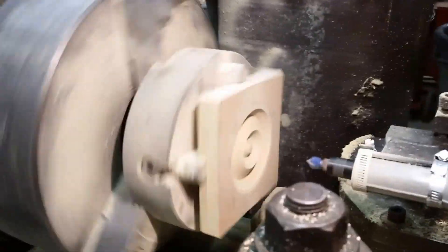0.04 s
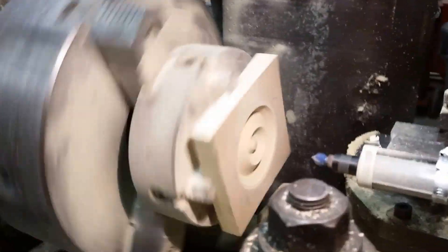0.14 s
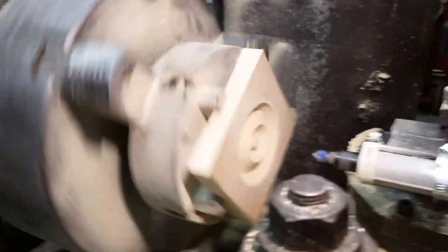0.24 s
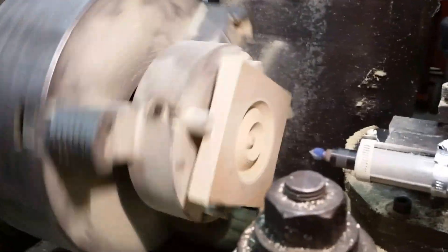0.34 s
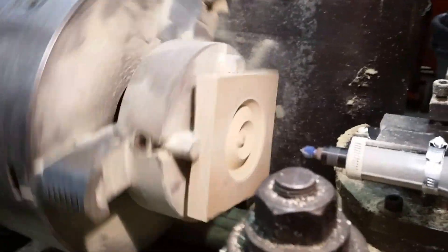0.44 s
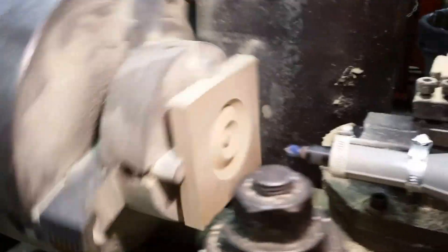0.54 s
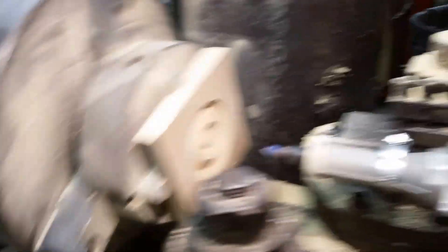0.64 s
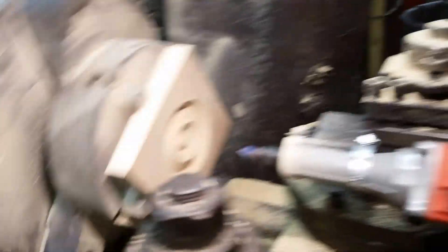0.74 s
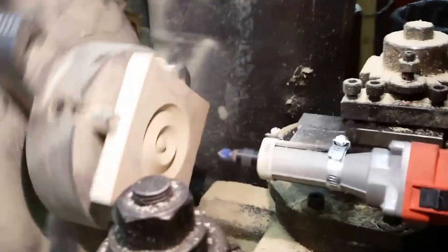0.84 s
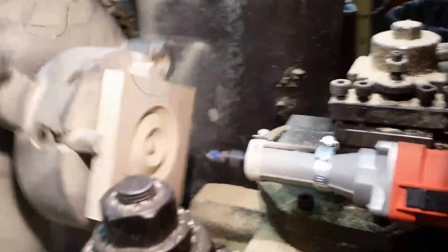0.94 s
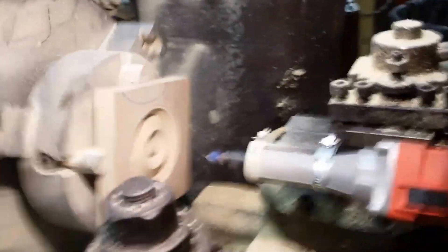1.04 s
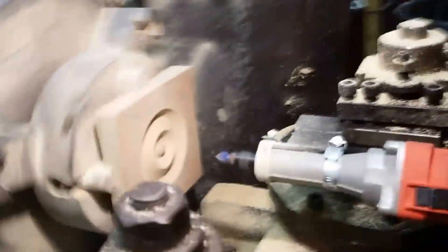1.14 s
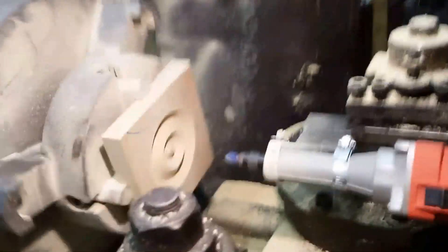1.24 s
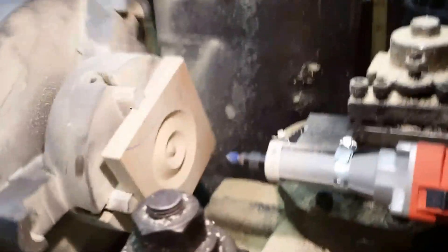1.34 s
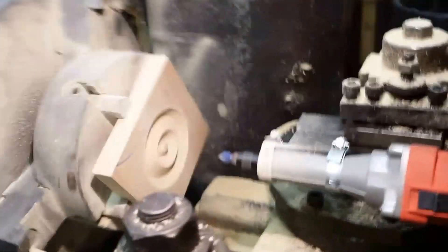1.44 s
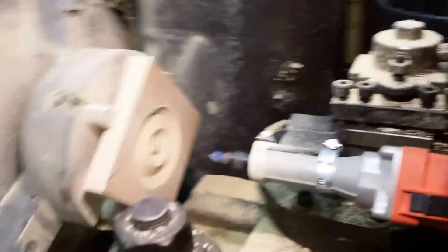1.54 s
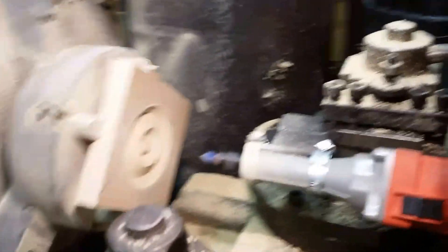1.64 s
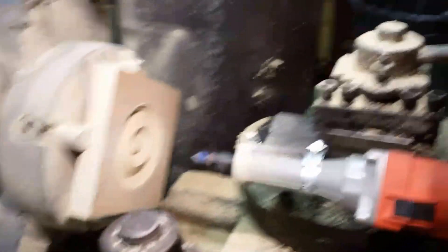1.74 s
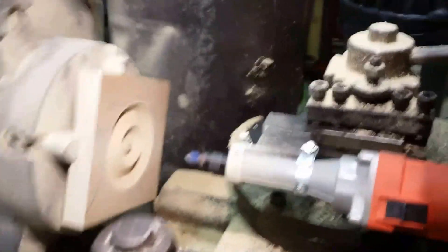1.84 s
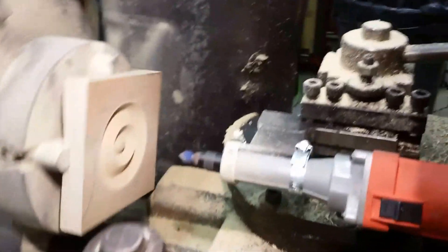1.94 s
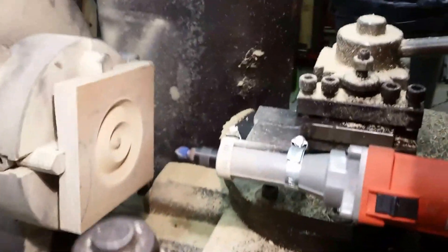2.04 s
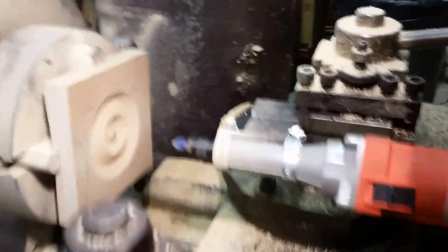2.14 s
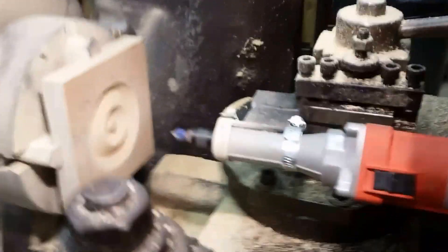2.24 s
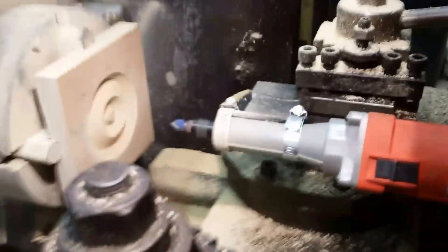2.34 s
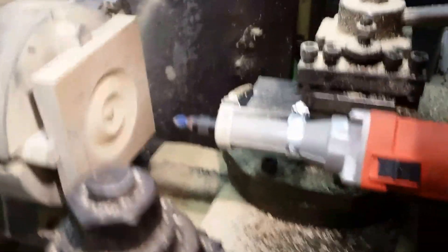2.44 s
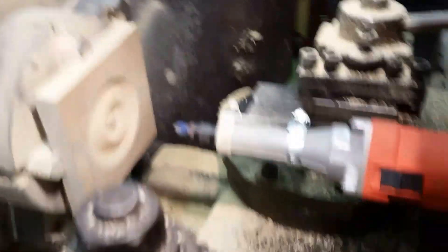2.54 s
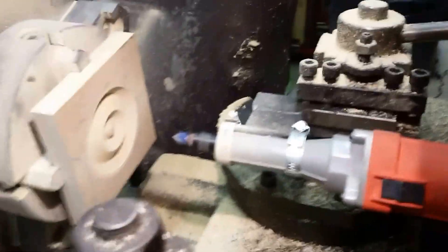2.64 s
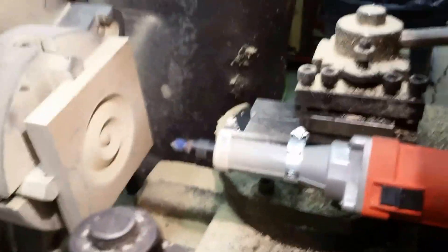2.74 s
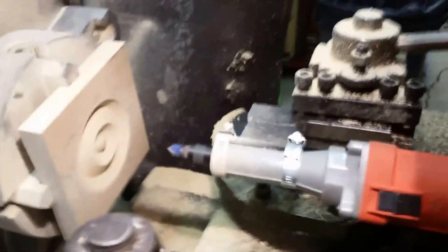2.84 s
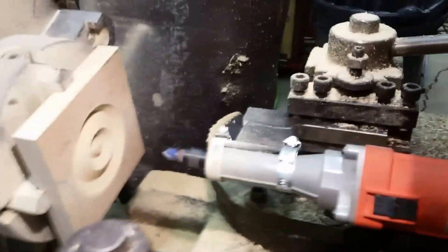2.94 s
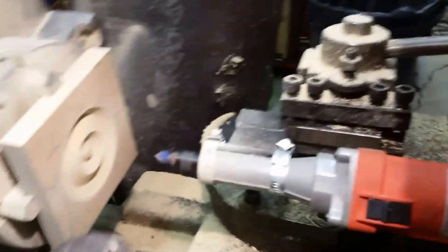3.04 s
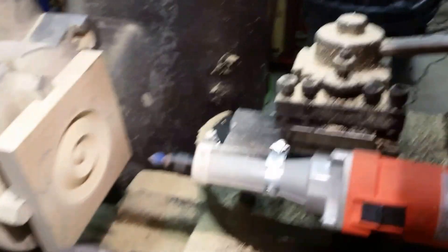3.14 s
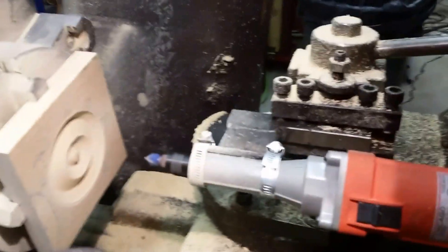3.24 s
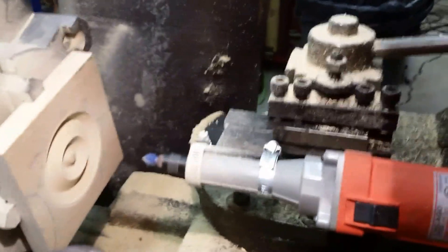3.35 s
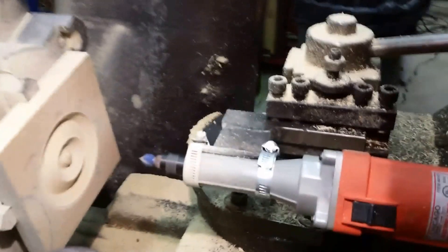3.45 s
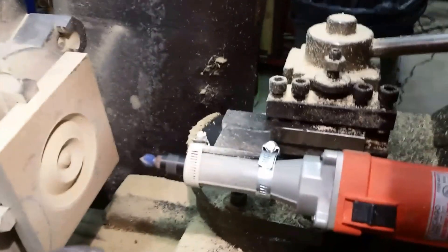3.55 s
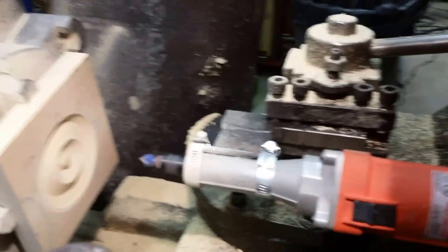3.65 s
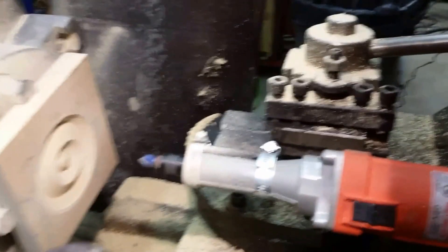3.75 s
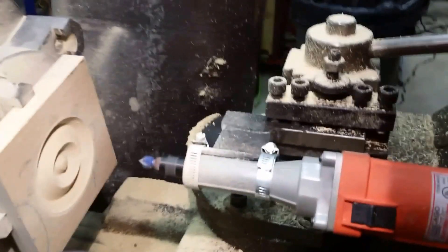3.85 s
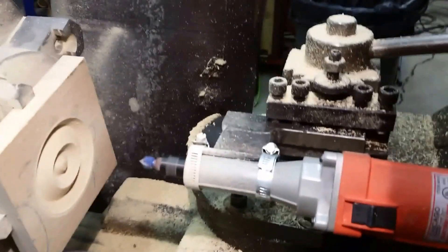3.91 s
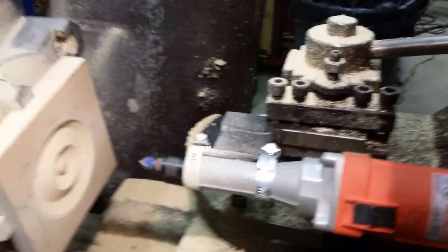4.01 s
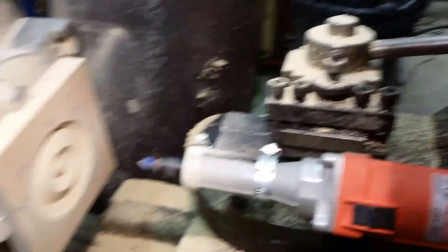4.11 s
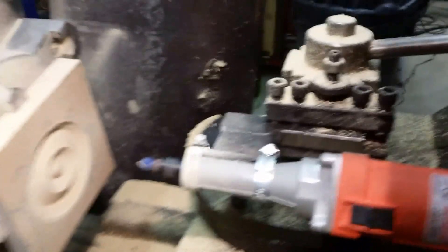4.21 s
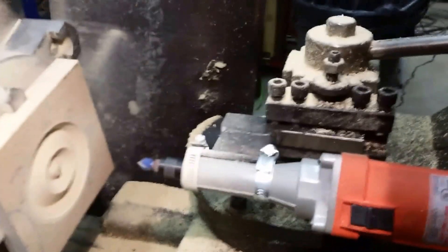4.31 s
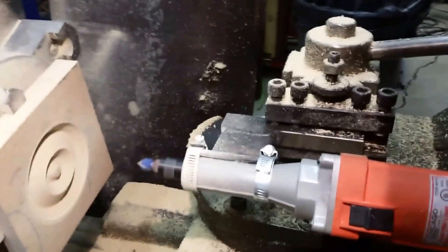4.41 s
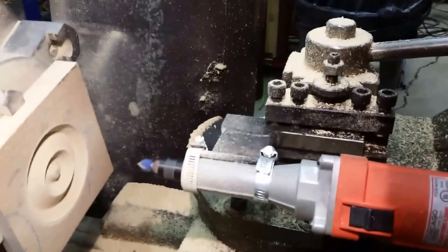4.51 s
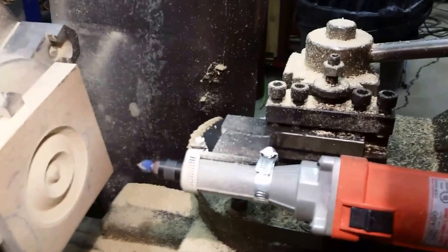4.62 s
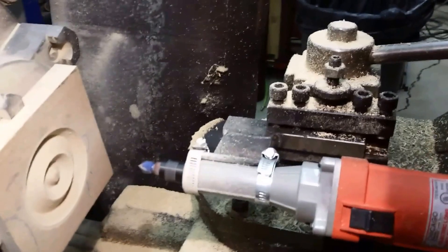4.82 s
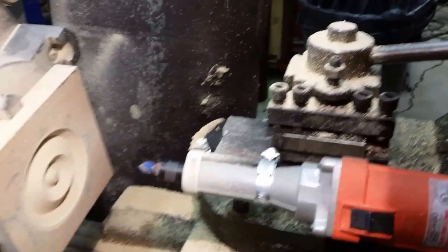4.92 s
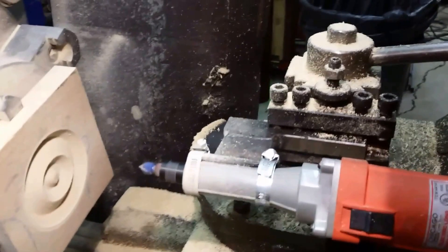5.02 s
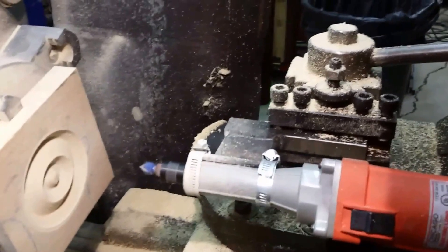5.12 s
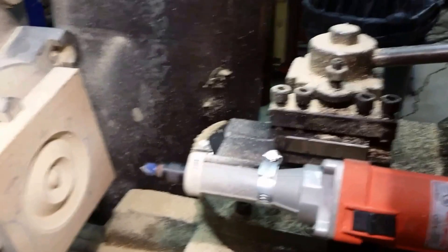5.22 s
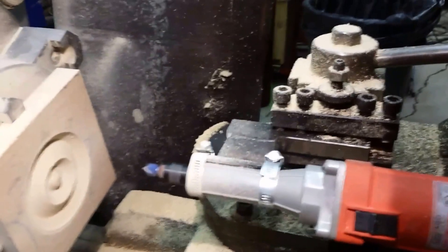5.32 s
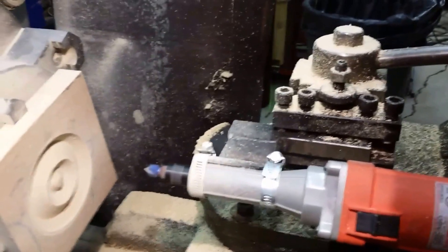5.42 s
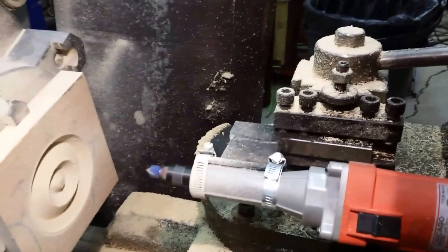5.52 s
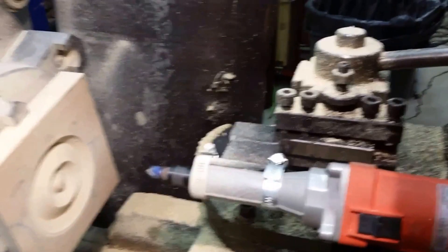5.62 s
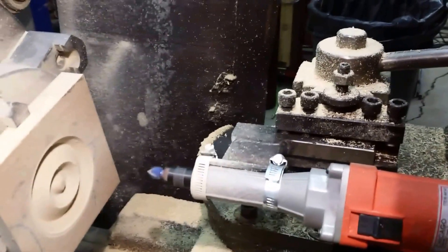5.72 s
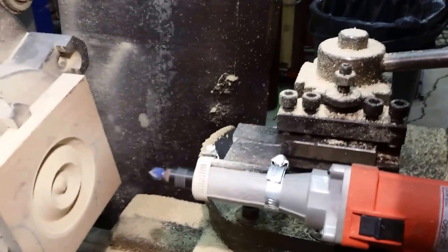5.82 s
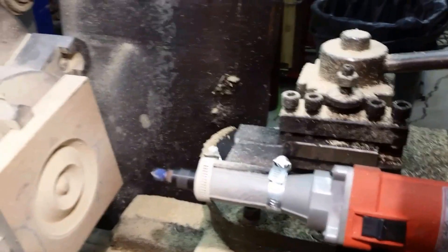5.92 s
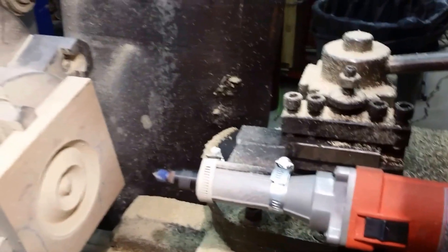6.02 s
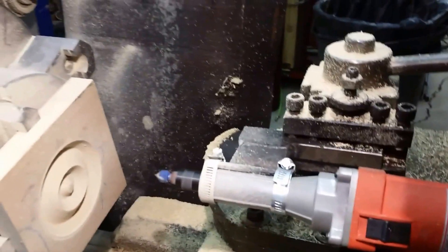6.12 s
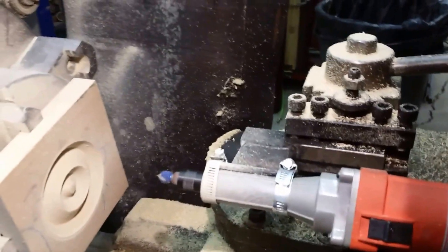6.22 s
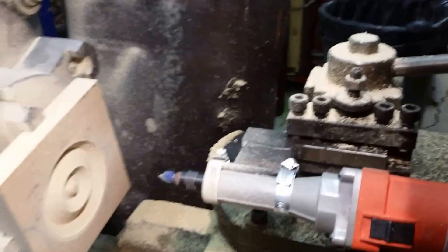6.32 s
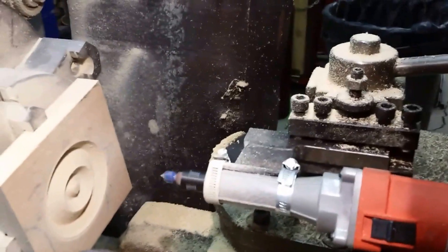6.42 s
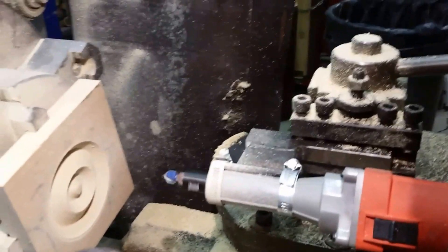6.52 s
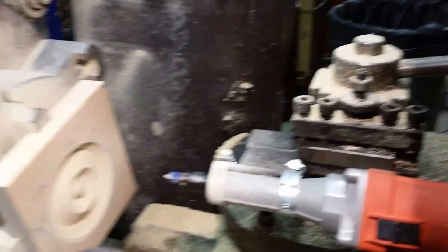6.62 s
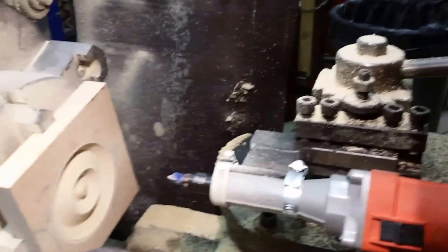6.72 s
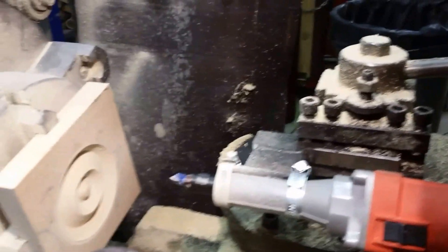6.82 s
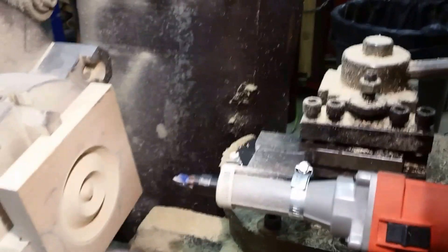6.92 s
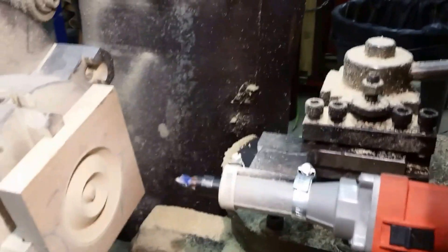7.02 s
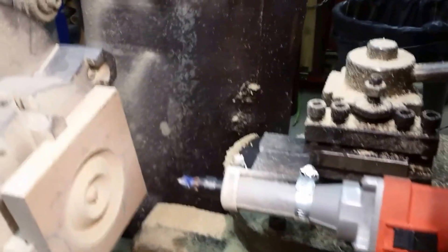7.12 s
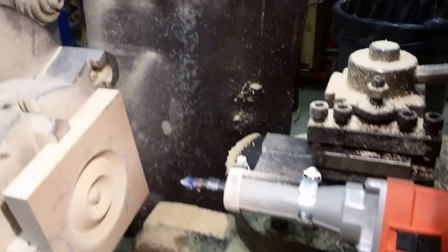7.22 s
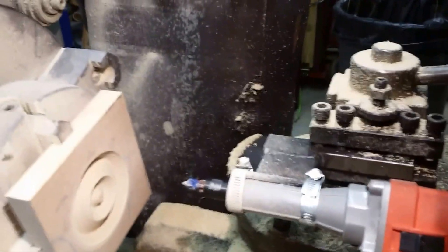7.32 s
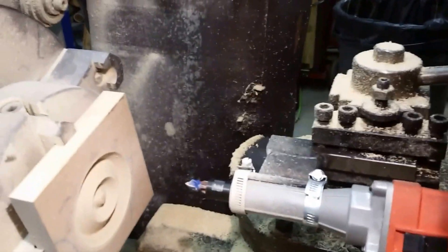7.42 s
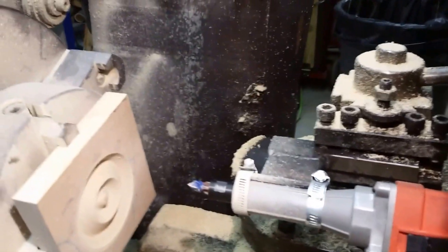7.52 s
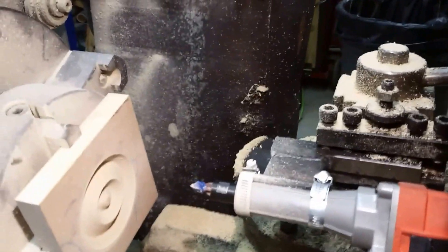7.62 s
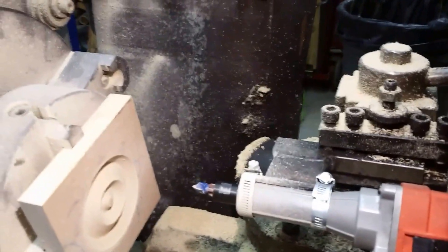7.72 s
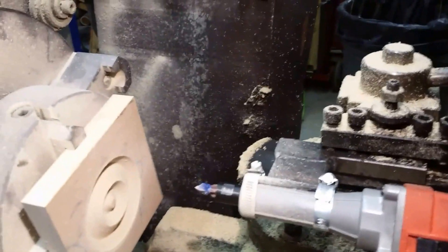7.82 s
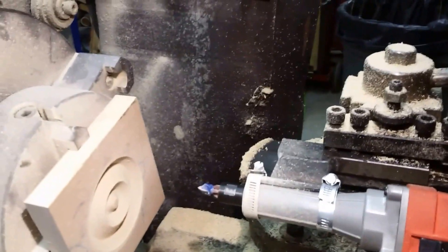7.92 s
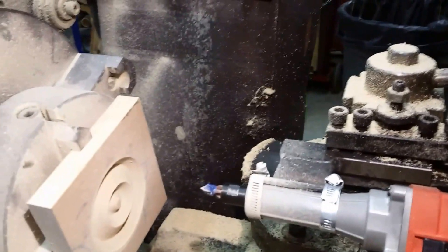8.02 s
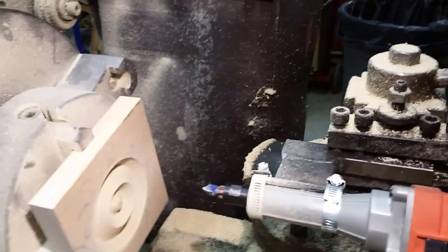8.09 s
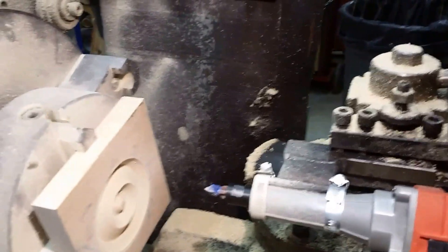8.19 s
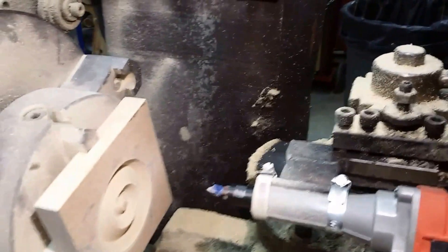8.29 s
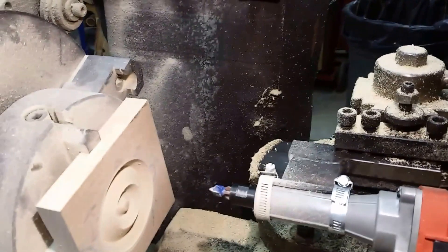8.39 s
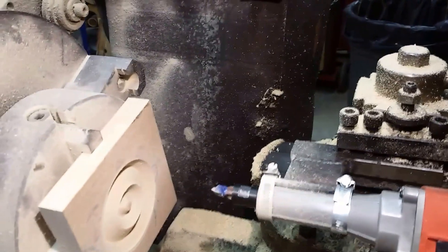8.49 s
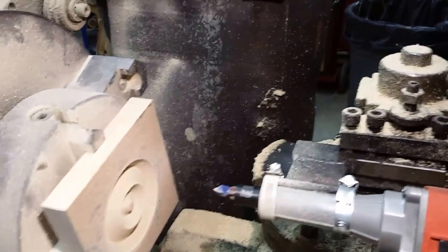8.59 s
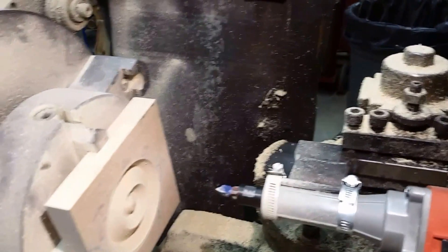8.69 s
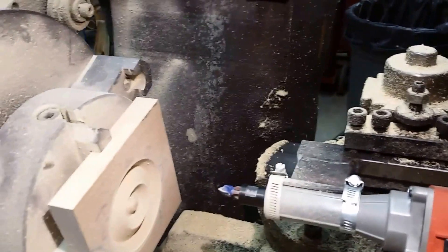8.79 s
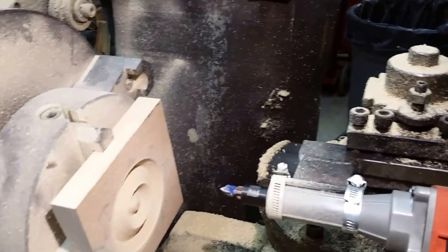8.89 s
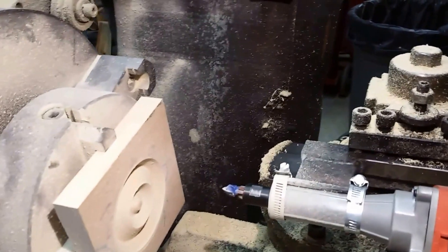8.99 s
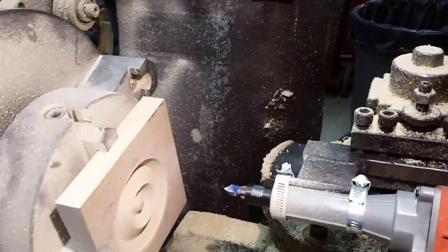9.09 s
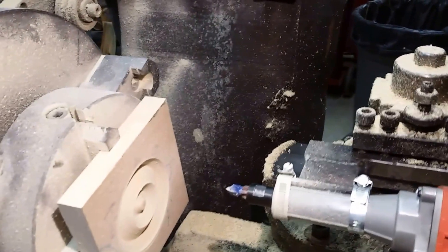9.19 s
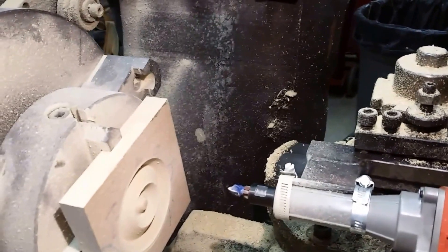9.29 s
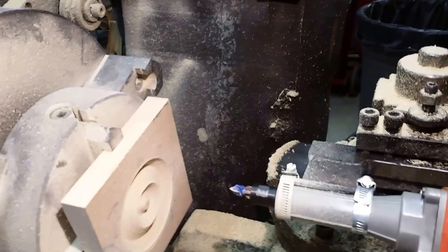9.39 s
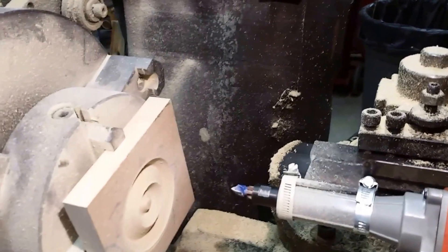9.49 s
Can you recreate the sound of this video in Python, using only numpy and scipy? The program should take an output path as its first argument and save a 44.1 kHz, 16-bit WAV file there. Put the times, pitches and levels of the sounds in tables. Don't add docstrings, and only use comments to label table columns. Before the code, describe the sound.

A switched-off die grinder's shrill whine glides steadily down through rushing air and brush hiss, rattles briefly, clicks to a stop, leaving quiet motor hum.

```python
import sys
import numpy as np
from scipy import signal
from scipy.fft import rfft, irfft, next_fast_len
from scipy.io import wavfile
from scipy.ndimage import uniform_filter1d, map_coordinates

SR = 44100
rng = np.random.default_rng(int(sys.argv[2]) if len(sys.argv) > 2 else 0)


def level_to_linear(level):
    exponent = np.asarray(level, float) / 20
    return 10 ** exponent


def output_pcm(signal):
    pcm = np.clip(np.atleast_2d(signal).T, -1, 1) * 32767
    wavfile.write(sys.argv[1], SR, np.round(pcm).astype(np.int16))


N = 421155
TIME_S = np.arange(N) / SR


def unit(x):
    return x / np.sqrt(np.mean(x ** 2) + 1e-20)


def along(points, hz):
    f, v = np.transpose(points)
    return np.interp(np.log(hz + 1), np.log(f + 1), v)


def curves(rows):
    s, *cols = np.transpose(rows)
    return [np.interp(TIME_S, s, c) for c in cols]


def wobble(rate_hz):
    knots = rng.standard_normal(int(N * rate_hz / SR) + 4)
    return map_coordinates(knots, [np.arange(N) * rate_hz / SR])


def filtered(x, response):
    m = next_fast_len(N + 8192)
    return irfft(rfft(x, m) * response(np.fft.rfftfreq(m, 1 / SR)), m)[..., :N]


def rush(spectrum, patchy_db):
    z = signal.stft(rng.standard_normal((2, N)), nperseg=512)[2]
    field = uniform_filter1d(rng.standard_normal(z.shape[1:]), 6, 0)
    field = uniform_filter1d(field, 12, 1)
    pair = signal.istft(z * level_to_linear(patchy_db * unit(field)), nperseg=512)[1][:, :N]
    return unit(filtered(pair, lambda hz: level_to_linear(along(spectrum, hz))))


# time in seconds, speed in turns per second (Hz).
SPEED = [(0, 460), (.3, 419.5), (.6, 381.8), (.9, 348), (1.2, 317.4), (1.6, 281.2), (2, 248.5),
         (2.4, 218.8), (2.8, 191.6), (3.2, 168.5), (3.6, 146.9), (4, 126.2), (4.4, 105.6), (4.8, 85.7),
         (5.2, 66.5), (5.7, 43.5), (6.5, 8)]


def shaft():
    speed_hz, = curves(SPEED)
    return np.cumsum(speed_hz) / SR, speed_hz


# order, level in dB at 200 Hz shaft speed, change in dB per octave of speed.
ORDER = [(1, -33.8, 3.3), (2, -48.0, 4.9), (3, -45.5, -1.4), (4, -48.4, 2.7), (5, -46.9, 11.3),
         (6, -48.9, 11.2), (7, -47.7, 13.1), (8, -53.2, 10.8), (9, -51.5, 0.6), (10, -50.5, 10.5),
         (11, -49.5, 1.5), (12, -41.2, 1.8), (13, -50.9, -0.0), (14, -53.9, 1.7), (15, -55.9, 5.9),
         (16, -60, 5), (17, -59, 5), (18, -55.4, 5.2), (19, -54.7, 4.6), (20, -54.5, 1.2),
         (23, -56.6, -5.9), (24, -53.0, -8.0), (36, -56.3, -15.4), (48, -55, -4.3), (60, -52.0, 0.2)]
# centre in Hz, width in Hz, peak in dB.
RESONANCES = [(134, 28, -3.1), (214, 18, -15.7), (315, 58, -5.8), (413, 43, -12.7), (581, 86, -3.4),
              (684, 77, 2.2), (842, 139, 6.4), (992, 154, 3.7), (1116, 145, 2.6), (1369, 182, 5.8),
              (1606, 209, 6.2), (1727, 209, 6.1), (1997, 469, -2.7), (2334, 390, -5.3),
              (2908, 486, -6.6), (3391, 285, 4.4), (3631, 422, 8.6), (4012, 358, 12.6), (4405, 393, 11.7),
        (4781, 477, -1.9), (5253, 478, 9.7), (5614, 638, -8.0), (6016, 774, 3.0), (7300, 951, -11.0),
        (13500, 4000, -7)]
# time in seconds, level in dB, treble over bass in dB.
SONG = [(0.0, -0.9, 1.9), (0.3, 2.5, 3.3), (0.55, 3.8, 4.0), (0.8, 3.5, 1.0), (1.2, -4.4, -5.3),
        (1.45, -3.8, -3.7), (2.0, 4.2, -1.8), (2.4, 5.9, -0.3), (2.9, 3.2, -3.2), (3.5, 3.9, -0.0),
        (4.2, -1.4, -1.7), (4.7, -4.4, 1.4), (5.6, -12.4, 10.9)]
# time in seconds, half length in
# seconds, order, lift in dB.
FLARES = [(-0.04, 0.44, 10, -11), (0.02, 0.1, 8, -12.5), (0.45, 0.11, 8, 7.0), (0.62, 0.08, 14, -8.2),
          (0.76, 0.12, 11, -11.6), (0.83, 0.23, 7, -10.1), (0.92, 0.19, 10, -9.3), (1.2, 0.41, 9, 16.2),
          (1.22, 0.23, 15, 13.8), (1.29, 0.43, 14, 7.7), (1.51, 0.44, 10, 9.1), (1.57, 0.23, 13, 9.8),
          (1.6, 0.16, 6, 6.8), (1.69, 0.16, 8, 11.6), (1.8, 0.31, 5, -8.8), (2.14, 0.19, 20, 9.9),
          (2.29, 0.36, 9, 7.2), (2.76, 0.3, 6, -11.1), (2.96, 0.16, 10, 7.7), (3.3, 0.2, 12, 6.2),
          (3.33, 0.33, 8, 9.3), (3.74, 0.18, 12, -9.1), (4.4, 0.49, 24, 14.4), (4.45, 0.34, 23, 13.2),
          (.15, .15, 12, 2), (.45, .11, 12, -5), (1.05, .18, 12, -6), (1.58, .12, 3, -1),
               (4.17, .035, 36, -6), (4.39, .07, 36, -9), (4.66, .06, 36, -3), (3.6, .2, 36, -4),
               (.33, .07, 10, -6), (1.2, .1, 5, -1.5), (1.4, .07, 6, -6), (2.7, .3, 3, -1),
          (.22, .07, 6, -8), (.45, .07, 6, 3), (.7, .05, 6, -6), (.7, .06, 7, -6), (.72, .08, 8, -5),
            (.07, .04, 9, 7), (.63, .06, 9, 5), (.02, .03, 10, -8), (.42, .03, 10, -3), (.57, .04, 10, -3),
            (.08, .03, 11, 5), (.2, .04, 11, -5), (.33, .03, 12, -5), (.03, .05, 12, 2), (1.1, .25, 36, 12),
            (3.65, .2, 36, 4), (3.96, .03, 36, 5), (4.09, .03, 36, 6), (3.2, .4, 48, -6), (1.8, .5, 48, 3),
            (2.3, .6, 60, -5), (4.27, .04, 36, 3), (4.02, .025, 36, -5), (.05, .08, 6, 4), (.4, .1, 15, 2),
            (2.4, .3, 5, 2), (.5, .1, 11, -3), (4.2, .1, 24, -4), (.3, .1, 5, -3), (.2, .08, 8, 2),
            (1.85, .15, 7, 3), (3.5, .15, 10, 4)]


def orders(turns, speed_hz):
    n = int(6.3 * SR)
    at = np.arange(0, n, 256)
    at_s = at / SR
    out = np.zeros((2, N))
    centre_hz, width_hz, peak_db = np.transpose(RESONANCES)
    flutter = [wobble(24.73)[:n], wobble(40)[:n], wobble(60)[:n]]
    crawl_hz, reference_hz = 45, 200
    octaves = np.log2(np.maximum(speed_hz[at], crawl_hz) / reference_hz)
    song_db, facing_db = (c[at] for c in curves(SONG))
    settle_s, settle_db_per_s = 5.25, 25
    song_db = song_db - settle_db_per_s * np.clip(at_s - settle_s, 0, None)
    flares = FLARES
    for row, (order, db, slope_db) in enumerate(ORDER):
        hz = order * speed_hz[at]
        modes = level_to_linear(peak_db) / (1 + (2 * (hz[:, None] - centre_hz) / width_hz) ** 2)
        ring = np.sqrt(np.sum(modes ** 2, axis=1))
        flare_db = sum(lift_db * np.exp(-((at_s - s) / half_s) ** 4)
                       for s, half_s, k, lift_db in flares if k == order)
        treble = np.tanh(3 * np.log(hz / 2700))
        swell = ring * level_to_linear(db + slope_db * octaves + song_db + facing_db * treble + flare_db)
        off_slot = order % 12
        rough = 1 + 0.054 * off_slot
        shake_db = 1.1 * rough * flutter[row % 3] + (.6 + .8 * (off_slot > 0)) * wobble(13)[:n]
        level = 1.62 * np.interp(np.arange(n), at, swell) * level_to_linear(shake_db)
        jitter_turns = 0.036 * rough * flutter[(row + 1) % 3]
        phase = 2 * np.pi * (order * turns[:n] + jitter_turns + row * .37)
        out[:, :n] += level * np.array([np.sin(phase), np.cos(phase)])
    return out


def hand_shade():
    middle_s, width_s = .75, .035
    return np.exp(-.5 * ((TIME_S - middle_s) / width_s) ** 2)


# time in seconds, level in dB, treble over bass in dB facing the vents.
TOOL = [(0, -1.5, 5.5), (.3, -1, 4), (.5, -2, 5), (.66, -2, 5), (.88, 1, 0.9), (1.2, 2, -1), (1.4, 0, 0.3),
        (1.55, 0.6, 0), (2, 1, -0.2), (2.35, 3, -0.6), (2.8, 2.5, -1.7), (3.2, 1, 0.2), (3.6, 1.3, -0.5),
        (4.2, 0.2, 0.5), (4.7, 0, -0.8), (5.2, -3, 0.5), (5.7, -9, 4), (6.2, -16, 5.5)]


def heard_db(db, grows, turned, shade_loss_db):
    level_db, facing_db = curves(TOOL)
    return db + grows * level_db + turned * facing_db - shade_loss_db * hand_shade()


def unbalance(depth_db, turns, speed_hz):
    loose = np.clip(60 / speed_hz, 0, 1.2)
    return level_to_linear(depth_db * loose * (np.cos(2 * np.pi * turns) + 0.28 * np.cos(np.pi * turns)))


# time in seconds, level in dB.
GAIN = [(0, -55), (.25, -64), (1.46, -59.5), (2.25, -50), (4.23, -36.5), (5.4, -35), (9.55, -35)]


def gain_below_end_db():
    gain_db, = curves(GAIN)
    return gain_db - gain_db[-1]


# frequency in Hz, level in dB per Hz.
CASING = [(150, -23), (300, -10), (500, -2.5), (700, 1), (900, 6), (1150, 0), (1350, -49), (1600, -60)]


def casing_air(shake):
    quiet_db = 8 * np.clip(TIME_S - 4.7, 0, 3)
    level_db = heard_db(-36.5, grows=0.15, turned=0.43, shade_loss_db=4)
    level_db = level_db + 0.079 * gain_below_end_db() + 0.3 * shake - quiet_db
    return level_to_linear(level_db) * rush(CASING, patchy_db=1.5)


# frequency in Hz, level in dB per Hz.
VENT = [(1000, -34), (1200, 0.5), (1400, 2.5), (1700, 6.5), (2100, 3), (2500, -2), (2950, -4.5),
        (3300, -40)]


def vent_air(shake, turns, speed_hz):
    level_db = heard_db(-30.5, grows=0.77, turned=-0.7, shade_loss_db=4) + .3 * shake
    return level_to_linear(level_db) * unbalance(3, turns, speed_hz) * rush(VENT, patchy_db=.5)


# frequency in Hz, level in dB per Hz.
FAN = [(2700, -24.5), (3050, -2), (3600, 4), (4000, 4), (4500, 7), (4900, 4.5), (5300, 1.5), (5800, -30)]


def fan_air(shake, turns, speed_hz):
    level_db = heard_db(-26.5, grows=1.56, turned=1.55, shade_loss_db=-2.5) + .3 * shake
    return level_to_linear(level_db) * unbalance(1.2, turns, speed_hz) * rush(FAN, patchy_db=.6)


# frequency in Hz, level in dB per Hz.
TIPS = [(4800, -42), (5250, 3.5), (5700, 2.5), (6100, -0.5), (6800, -7), (7600, -22), (8600, -27.5),
        (10000, -50)]


def tip_air(shake, turns, speed_hz):
    level_db = heard_db(-35, grows=1.3, turned=1.34, shade_loss_db=8) + 0.32 * shake
    return level_to_linear(level_db) * unbalance(1.3, turns, speed_hz) * rush(TIPS, patchy_db=1.5)


# frequency in Hz, level in dB per Hz.
CLAMP = [(90, -38), (140, -4.5), (200, -3), (300, -4), (450, -9), (600, -25.5)]


def clamp_rumble():
    level_db, _ = curves(TOOL)
    return level_to_linear(-42 + 0.37 * gain_below_end_db() + 0.81 * level_db) * rush(CLAMP, patchy_db=0.5)


# frequency in Hz, level in dB per Hz.
THROAT = [(1250, -22), (1480, -4), (1610, 0), (1750, -3), (2050, -38)]


def throat_air(turns, speed_hz):
    middle_s, half_s = 4.1, 0.52
    level_db = -33.5 - 8.3 * ((TIME_S - middle_s) / half_s) ** 4 + 1.3 * wobble(25.1)
    return level_to_linear(level_db) * unbalance(5.5, turns, speed_hz) * rush(THROAT, patchy_db=0.5)


def air_rush(turns, speed_hz):
    shake = wobble(10)
    air = casing_air(shake) + vent_air(shake, turns, speed_hz)
    air += fan_air(shake, turns, speed_hz) + tip_air(shake, turns, speed_hz)
    air += clamp_rumble() + throat_air(turns, speed_hz)
    return air * level_to_linear(-30 * np.clip(TIME_S - 6.1, 0, 4))


# time in seconds, level in dB, brightness 0-1.
BRUSH = [(0, -39.5, 0.1), (.34, -39, 0.45), (1.12, -40.5, 0.6), (1.36, -46, 0), (2.9, -42, 0.57),
         (3.78, -37.5, 1), (4.65, -39, 0.9), (5.38, -41.5, 0.9), (5.96, -50, 0.7), (6.5, -55, .5)]
# frequency in Hz, level in dB per Hz.
HISS_LEFT = [(6000, -60), (8000, -5), (9000, 1.5), (9900, -16), (10600, 7.5), (11500, 10), (12800, 12),
             (13800, 4), (14800, -2), (15900, -13)]
# frequency in Hz, level in dB per Hz.
HISS_RIGHT = [(6500, -42), (7800, -18), (8500, -4), (9500, 0), (10200, 6), (10900, 1), (12000, 4),
              (12700, 7), (13500, 5), (14800, 8), (15700, 6)]
# frequency in Hz, share 0-1.
OPPOSED = [(7500, .1), (8500, .85), (9000, .35), (9600, .85), (10200, .25), (16000, .15)]
# time in seconds, tightness 0-1.
GRIP = [(0, 0.1), (.45, 0.08), (.76, 0.45), (1.14, 0.3), (1.4, 1), (2.3, 1), (5.6, 1), (6.5, 0.6)]


def brushes():
    def flat():
        return rush([(100, 0), (20000, 0)], patchy_db=2.2)

    def coloured(pair, tilt_db):
        def colour(hz):
            port_db = np.array([along(HISS_LEFT, hz), along(HISS_RIGHT, hz)])
            return level_to_linear(port_db + tilt_db * (hz - 12500) / 3000)
        return unit(filtered(pair, colour))

    def antiphase(hz):
        share = along(OPPOSED, hz)
        return np.array([np.sqrt(1 - share ** 2), -share])

    hiss_db, bright = curves(BRUSH)
    bright = np.clip(bright, 0, 1)
    grip, = curves(GRIP)
    pan_db = 5.5 - 7.5 * grip
    near, far = flat()
    crossed = filtered(np.array([near, far]), antiphase).sum(0)
    dull = coloured(np.array([crossed, far]), -3)
    sharp = coloured(flat(), 3)
    hiss = np.sqrt(1 - bright) * dull + np.sqrt(bright) * sharp
    level_db = hiss_db - 4.5 * hand_shade() + 4.0 + 0.51 * wobble(9.9) + 0.3 * wobble(25.3)
    stop = level_to_linear(-25 * np.clip(TIME_S - 5.95, 0, 3))
    return level_to_linear(level_db + np.array([pan_db, -pan_db]) / 2) * hiss * stop


# order of the motor shaft, level in dB.
HUM = [(1, -27.5), (2, -21.5), (3, -13.5), (4, 0.5), (5, -11), (6, -8.5), (8, -13), (11, -18), (12, -12)]


def motor_hum():
    motor_hz = 29.96
    spin = 2 * np.pi * motor_hz * TIME_S + 0.2 * wobble(1.493)
    tone = 0
    for order, db in HUM:
        level_db = db + 2 + .055 * abs(db - 18) * wobble(8)
        phase = round(order) * spin + .09 * order * wobble(6) + order * order * .4
        tone = tone + level_to_linear(level_db) * np.exp(1j * phase)
    return tone


# frequency in Hz, level in dB.
WHINE = [(259, -7), (518, -24.5), (700.5, -10.5), (1039, -20.5), (1400, -20.5), (2102, -17), (3503, -19.5),
         (3854, -25), (4204, -19.5), (4554, -18)]


def shop_whine():
    late_db = np.interp(TIME_S, (6.5, 7.3), [-6, 0])
    tone = 0
    for hz, db in WHINE:
        level_db = db + 2.5 + 1.8 * wobble(4) + late_db * (hz > 600)
        phase = 2 * np.pi * hz * TIME_S + 0.67 * wobble(3)
        tone = tone + level_to_linear(level_db) * np.exp(1j * phase)
    return tone


# frequency in Hz, level in dB per Hz.
SHOP = [(15, -50), (25, -28), (43, -24), (80, -10), (123, -3.5), (260, -3), (360, -8.5), (450, -13.5),
        (690, -11.5), (860, -16.5), (1400, -12.5), (2000, -15), (2890, -20), (4450, -15)]
# frequency in Hz, level in dB per Hz.
SHOP_TOP = [(4450, -19), (5600, -25), (6660, -28), (7600, -36), (8700, -49.5), (10000, -44), (11500, -42),
            (13000, -46), (15900, -47)]


def shop():
    tone = motor_hum() + shop_whine()
    room = rush(SHOP + SHOP_TOP[1:], patchy_db=0.24)
    gain_db, = curves(GAIN)
    return level_to_linear(gain_db) * (np.array([tone.real, tone.imag]) + room)


def strikes(events, low_hz, high_hz, t60_s, lift_db):
    out, t = np.zeros((2, N)), np.arange(700) / SR
    grits = rng.standard_normal((len(events), 2, len(t)))
    pitches_hz = rng.uniform(low_hz, high_hz, len(events))
    for (s, db), grit, hz in zip(events, grits, pitches_hz):
        shape = level_to_linear(db + lift_db - 60 * t / t60_s) * (1 - np.exp(-t / 0.00044))
        out[:, round(s * SR):][:, :len(t)] += shape * (np.sin(2 * np.pi * hz * t) + .5 * grit)
    return out


# time in seconds, peak in dB.
KNOCKS = [(4.6043, -22), (4.6233, -17), (4.6682, -17), (4.722, -13), (4.743, -11.5), (4.7659, -21),
          (4.7889, -22), (4.8148, -15), (4.8367, -12.5), (4.8837, -13), (4.9106, -14), (4.9346, -12.5),
          (4.9585, -22), (4.9864, -15), (5.038, -25), (5.0662, -19), (5.0816, -16), (5.1511, -27),
          (5.2124, -19), (5.2399, -20), (5.2683, -21), (5.3097, -21), (5.3426, -25), (5.3885, -26),
          (5.4194, -18), (5.4599, -20), (5.4958, -23), (5.5367, -21), (5.603, -28), (5.6165, -27),
          (5.6489, -30), (5.6933, -27), (5.7657, -28)]
# time in seconds, peak in dB.
TICKS = [(4.6718, -11), (4.6972, -13), (4.7212, -14), (4.7416, -19), (4.7661, -15), (4.788, -10),
         (4.814, -10), (4.8599, -14), (4.9092, -14), (4.9337, -21), (4.9591, -14), (4.9866, -16),
         (5.0115, -10), (5.037, -19), (5.0659, -15), (5.0918, -14), (5.123, -13), (5.1502, -19),
         (5.1786, -19), (5.2101, -16), (5.24, -18), (5.2714, -21)]
# time in seconds, peak in dB.
LAST = [
    (5.4946, -21),
    (5.77, -27),
    (6.1406, -26),
    (6.2033, -19),
]
# time in seconds, peak in dB.
SEATED = [
    (6.2033, -24),
]


def bearing():
    blows = strikes(TICKS, 4550, 4950, t60_s=0.0078, lift_db=8.0)
    blows += strikes(KNOCKS, 1540, 2140, t60_s=0.012, lift_db=7.5)
    blows += strikes(LAST, 4300, 5000, t60_s=.007, lift_db=4)
    casing_db = [(800, -30), (1300, -7.0), (5500, -3.5), (7200, -20)]
    blows = filtered(blows, lambda hz: level_to_linear(along(casing_db, hz)))
    thud = strikes(SEATED, 650, 800, t60_s=.035, lift_db=0)
    return blows + filtered(thud, lambda hz: 1 / (1 + 1j * hz / 1500) ** 3)


def grinder():
    turns, speed_hz = shaft()
    return orders(turns, speed_hz) + air_rush(turns, speed_hz) + bearing()


# frequency in Hz, left over right in dB.
COVERED = [(60, -6), (110, -11), (200, -10.5), (380, -14), (700, -13.5), (1290, -19), (1900, -19.5),
           (2500, -19), (3200, -24), (4500, -28), (5300, -30.5), (6500, -25), (8120, -9), (10500, 10.5),
           (15000, -1)]
# frequency in Hz, likeness 0-1.
ALIKE = [(60, .97), (300, .9), (700, .82), (1100, .35), (1600, .55), (2300, .2), (4500, .5), (7000, .15),
         (15000, .05)]
# frequency in Hz, left lead in radians.
LEAD = [(0, 0), (60, -.3), (200, -.65), (800, -1), (1500, -1.8), (4500, -2.2), (16000, -2.2)]


def ports(pair):
    def response(hz):
        cover, alike = level_to_linear(along(COVERED, hz)), np.clip(along(ALIKE, hz), 0, 1)
        gain = 2 / np.sqrt(1 + cover ** 2 + cover * alike)
        lead = np.exp(1j * along(LEAD, hz))
        return gain * np.array([np.ones_like(hz), cover * alike * lead, cover * np.sqrt(1 - alike ** 2)])

    right, same, other = filtered(pair[[0, 0, 1]], response)
    left = same + other
    leak = filtered(left, lambda hz: (hz > 900) * (hz < 9000) * np.clip(hz / 900 - 1, 0, 1))
    grip, = curves(GRIP)
    loose_db, seal_db = 3.1, -7
    return np.array([left + (level_to_linear(loose_db + seal_db * grip) - 1) * leak, right])


def scene():
    return ports(grinder() + shop()) + brushes()


def roll_off(x):
    return signal.sosfilt(signal.butter(12, 16920, fs=SR, output="sos"), x)


def record(dry):
    soft = dry / (1 + np.abs(dry / .95) ** 6) ** (1 / 6)
    limited = filtered(soft, lambda hz: hz < 15810)
    return roll_off(limited)


dry = scene()
out = record(dry)
output_pcm(out)
```